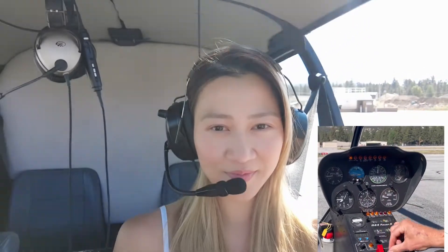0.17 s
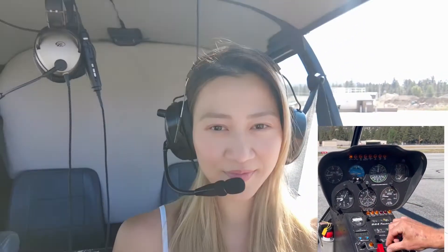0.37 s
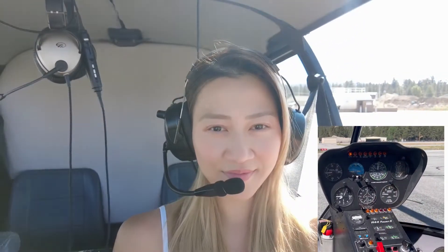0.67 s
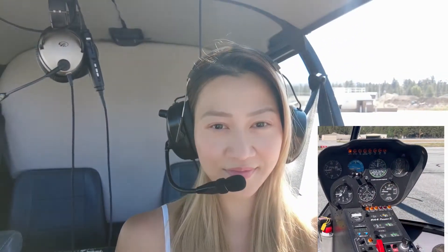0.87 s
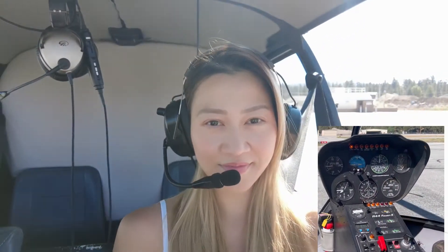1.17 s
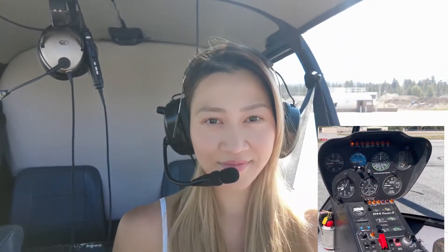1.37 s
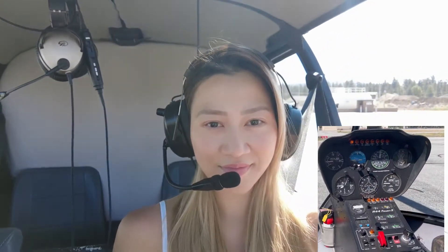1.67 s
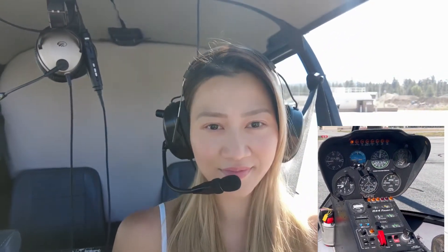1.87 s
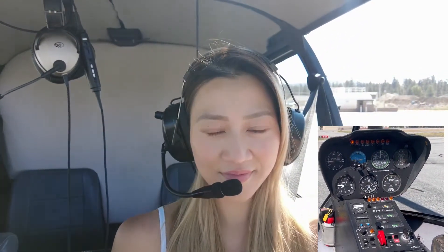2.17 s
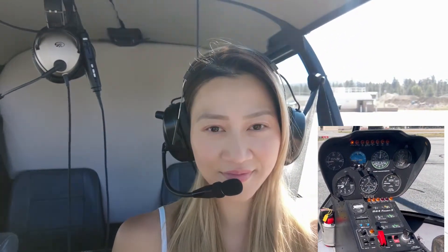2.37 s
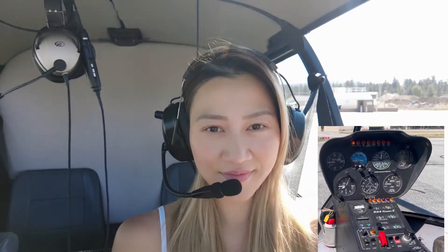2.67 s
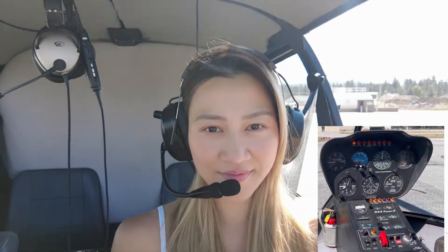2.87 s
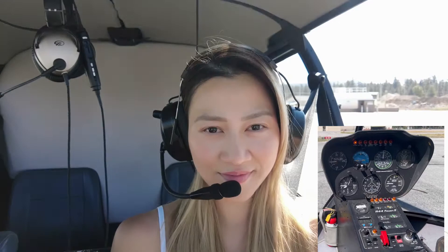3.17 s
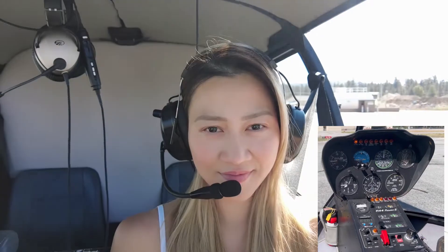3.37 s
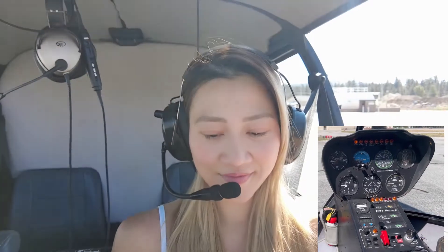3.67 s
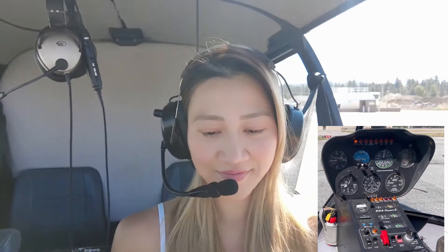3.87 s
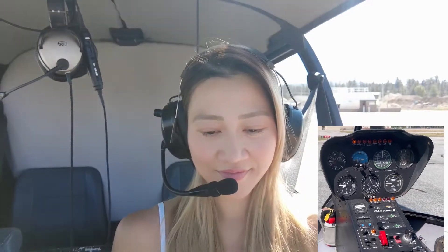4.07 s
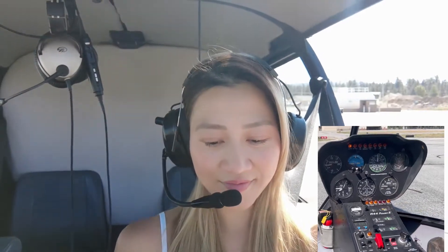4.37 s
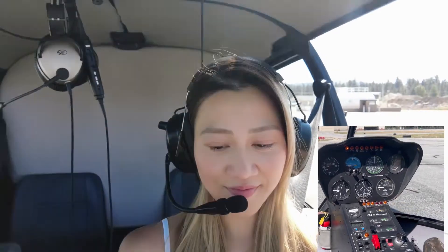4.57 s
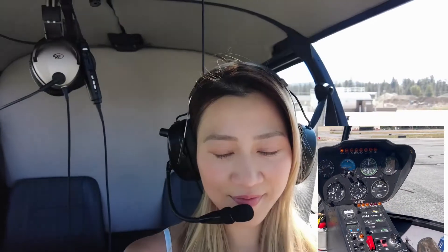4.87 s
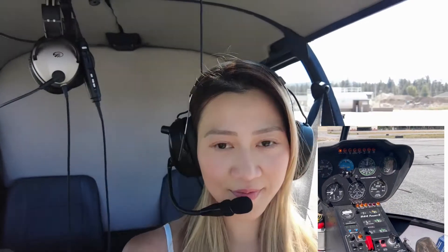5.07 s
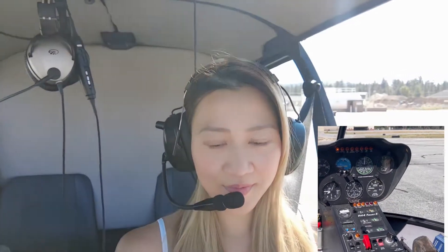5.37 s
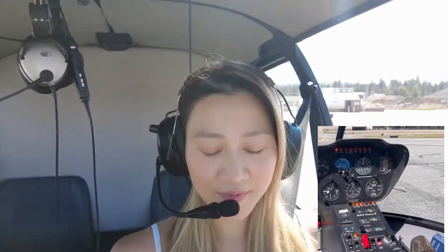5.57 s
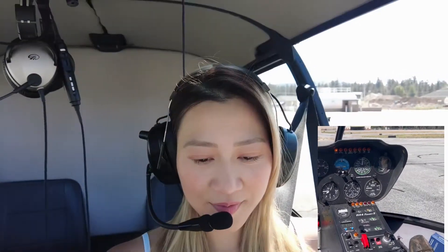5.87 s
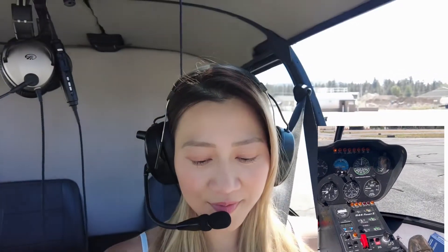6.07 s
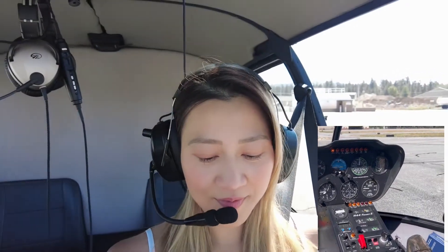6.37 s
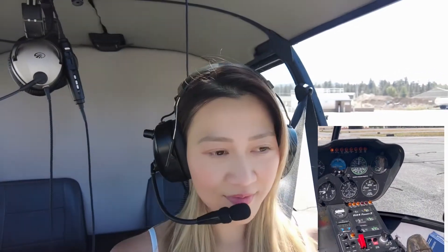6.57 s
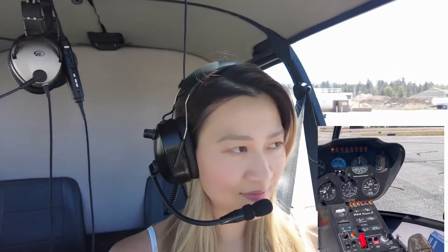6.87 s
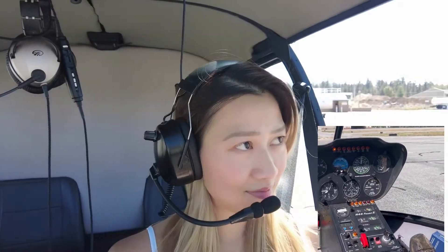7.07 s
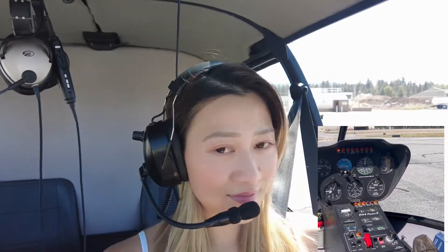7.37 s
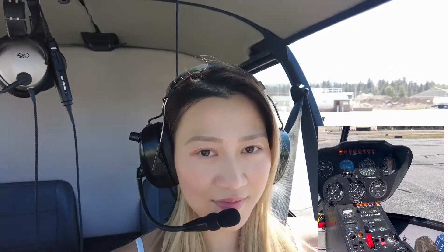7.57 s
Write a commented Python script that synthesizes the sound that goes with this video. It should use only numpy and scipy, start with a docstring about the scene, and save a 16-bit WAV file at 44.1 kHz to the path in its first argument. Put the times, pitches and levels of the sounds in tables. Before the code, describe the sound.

The sound starts with the engine already running inside a small helicopter cabin. A deep drone around 80 to 88 Hz throbs under rapid knocks, about fourteen each second, which ring boxy panels; a gear hum near 600 Hz and a grainy roar of cooling air and valve ticks lie above. Speed rises until 0.5 s, then sags to its lowest at 1.5 s, recovers by 2 s and keeps hunting gently. Bright switch clicks snap at 0.26 s, faintly at 0.6 s, at 1.5 s, and in a cluster from 3.5 to 3.7 s. Misfires thump low from 0.9 s, strongest at 1.4, 5.7 and 6.5 s. From 4.3 to 4.8 s the roar changes colour, some ringing peaks softening. The engine lifts around 5.6 s, dips at 6.7 s, then climbs until the end at 7.7 s, still running. Close, enclosed stereo, without speech.

```python
"""Inside a small helicopter's cabin: a six-cylinder engine idles, first races, then sags and hunts.
Throughout, firings drone at six times the cycle rate, a gear hums, knocks once a cycle ring the cabin,
and cooling air and valve gear roar as noise and ticks shaped by resonances. Switches click early on
and in a cluster near 3.6 s; from 0.9 s misfires thump a low mode. After 4.3 s the passenger leans
forward, which recolours the roar; the engine picks up at the end."""
import sys
import numpy as np
from scipy import signal
from scipy.fft import rfft, irfft, next_fast_len
from scipy.io import wavfile
from scipy.ndimage import uniform_filter1d

SR = 44100
rng = np.random.default_rng(int(sys.argv[2]) if len(sys.argv) > 2 else 0)


def persist_wave(psi):
    """Save psi, clipped to +-1, as 16-bit WAV."""
    counts = np.round(np.clip(psi, -1, 1) * 32767).astype(np.int16)
    wavfile.write(sys.argv[1], SR, np.atleast_2d(counts).T)


N = 340011

# cabin response against engine speed:
# speed_hz [cycles/s], octave_db [dB], gear_db [dB], roof_db [dB], door_db [dB offset]
CABIN_BY_SPEED = [(13.2, -29.5, -33.5, -41, -2), (13.5, -31, -26.5, -44, -1), (13.65, -28.5, -27.5, -40, 0),
                  (13.8, -24.5, -32, -36, 0), (14.1, -21.5, -44, -31, -2), (14.5, -18.5, -54, -32, -6)]


def undb(db):
    """Decibels to an amplitude factor."""
    return np.exp(np.asarray(db) * (np.log(10) / 20))


def level(x, db):
    """Set the rms level."""
    return x * undb(db) / np.sqrt(np.mean(x ** 2))


def by_speed(table, speed):
    """Read every level column of a table at the running engine speed."""
    table_hz, *columns = np.transpose(table)
    return [np.interp(speed, table_hz, column) for column in columns]


def walk(rate):
    """Random levels held 1 / rate s and slewed twice; spread near 1."""
    hold = int(SR / rate)
    steps = np.repeat(rng.standard_normal(N // hold + 1), hold)
    return 1.33 * uniform_filter1d(uniform_filter1d(steps, hold), hold)[:N]


def ring(x, hz, width):
    """A mode applied twice: the ring swells, then dies, with steep skirts."""
    pole = np.exp((2j * np.pi * hz - np.pi * width) / SR)
    return signal.lfilter([1], [1, -2 * pole, pole ** 2], x).imag


def later(x, ms):
    """Delay by whole samples; negative values advance."""
    return np.roll(x, int(round(ms * SR / 1000)))


def blows_at(turns):
    """Sample numbers where a running count of turns passes a whole number."""
    return np.flatnonzero(np.diff(np.floor(turns)))


def tone(cycle, order, db, turn, pan_db, lead, waver_db, drift):
    """A multiple of the cycle rate, wavering in level and phase; the left port leads by lead radians."""
    angle = 2 * np.pi * (order * cycle + turn) + drift * walk(11)
    size = np.sqrt(2) * undb(db + waver_db * walk(30))
    left = undb(pan_db / 2) * np.cos(angle + lead / 2)
    right = undb(-pan_db / 2) * np.cos(angle - lead / 2)
    return size * np.array([left, right])


def knock(cycle, place, hz, width, left_db, right_db, lag_ms):
    """One blow at the same crank angle of every cycle, each of its own strength, rings one mode."""
    scatter_db = 1.7
    at, blows = blows_at(cycle - place), np.zeros(N)
    blows[at] = undb(scatter_db * rng.standard_normal(128))[:len(at)]
    body = level(ring(blows, hz, width), 0)
    return np.array([undb(left_db) * body, undb(right_db) * later(body, lag_ms)])


def drone(cycle, speed):
    """Six firings a cycle make the main tone; its octave and a door tone follow the engine speed."""
    # firing tone, which fades and catches again: time_s [s], level_db [dB]
    firing_curve = [(0, -18.5), (.22, -13), (.46, -13.5), (.77, -13), (1.36, -19), (1.5, -11), (1.89, -12),
                    (1.91, -14.5), (2.655, -23), (2.675, -14), (2.9, -15), (3.6, -16), (3.7, -13.5),
                    (4.3, -12.5), (6.45, -17), (6.7, -10.5), (7.05, -14.5), (7.71, -11.5)]
    fire_db = np.interp(np.arange(N) / SR, *np.transpose(firing_curve))
    octave_db, _, _, door_db = by_speed(CABIN_BY_SPEED, speed)
    firing = tone(cycle, order=6, db=fire_db, turn=-.25, pan_db=-1.6, lead=0, waver_db=1.1, drift=.1)
    octave = tone(cycle, order=12, db=octave_db, turn=.45, pan_db=-.1, lead=.6, waver_db=1.3, drift=.1)
    door = tone(cycle, order=16, db=door_db - 41, turn=-.07, pan_db=8, lead=-.4, waver_db=1.1, drift=.15)
    return firing + octave + door


def gear(cycle, speed):
    """The gear hums on the 43rd multiple of the cycle, loudest where the cabin answers best."""
    _, gear_db, _, _ = by_speed(CABIN_BY_SPEED, speed)
    return tone(cycle, order=43, db=gear_db, turn=-.13, pan_db=2.1, lead=2, waver_db=1.6, drift=.3)


def singing(cycle, speed):
    """Multiples of the cycle sing as they cross a cabin mode; each swells while it lies on its mode."""
    # order [multiple of cycle], mode_hz [Hz], width_hz [Hz], level_db [dB on the mode],
    # left_minus_right_db [dB], left_lead_rad [rad], offset_turns [turns]
    sung_orders = [(13, 180, 30, -36, 0, .75, .62), (15, 200, 14, -41, -8, 0, .97),
                   (20, 274, 12, -43, 3, 1.2, .68), (21, 290, 24, -34, 1, .9, .37),
                   (24, 322, 26, -42, -9, 1, .89), (34, 468, 40, -39, -1, 2, 0),
                   (35, 516, 14, -31, 5, 2, 0), (37, 518, 30, -40, 6, 2, .05),
                   (40, 560, 20, -37, 3, 2, .41), (41, 578, 24, -35, 1, 2, .17),
                   (44, 592, 24, -36, 2, 2.3, .6), (46, 645, 24, -39, 3, 2, 0), (49, 655, 24, -41, 9, 2, 0),
                   (55, 745, 14, -40, -4, 2, 0), (56, 805, 20, -40, 6, 3, 0), (71, 970, 20, -46, -2, 3, 0)]
    out = 0
    for order, hz, width, db, pan_db, lead, turn in sung_orders:
        off_mode_db = 10 * np.log10(1 + (2 * (order * speed - hz) / width) ** 2)
        out = out + tone(cycle, order=order, db=db - off_mode_db, turn=turn,
                         pan_db=pan_db, lead=lead, waver_db=1.5, drift=.25)
    return out


def panel(cycle, speed):
    """A panel near 300 Hz rings best where a multiple of the cycle meets its mode; two tones join it."""
    # place_turns [0-1 of a cycle], mode_hz [Hz], width_hz [Hz],
    # left_db [dB over ring_db], right_db [dB over ring_db], right_lag_ms [ms]
    panel_modes = [(0.375, 301, 38, -7, -1.5, 0.44), (0.695, 322, 16, -15, -8, 0.42)]
    # panel response: speed_hz [cycles/s], ring_db [dB], tone_db [dB, 22nd multiple]
    panel_response = [(13.2, -31, -33), (13.45, -26.5, -34), (13.7, -23.5, -34), (14.15, -25.5, -26),
                      (14.5, -34, -30), (14.8, -30, -36)]
    ring_db, sing_db = by_speed(panel_response, speed)
    rings = undb(ring_db) * sum(knock(cycle, *mode) for mode in panel_modes)
    high = tone(cycle, order=22, db=sing_db, turn=-0.33, pan_db=-6, lead=0.97, waver_db=0.9, drift=0.21)
    low = tone(cycle, order=14, db=-31.5, turn=0.51, pan_db=-9, lead=0.37, waver_db=1.5, drift=0.24)
    return rings + high + low


def knocks(cycle, speed):
    """Blows once a cycle ring the cabin; door and roof rings also change with engine speed."""
    # cabin modes: place_turns [0-1 of a cycle], mode_hz [Hz], width_hz [Hz],
    # left_db [dB, doors before their offset], right_db [likewise], right_lag_ms [ms]
    cabin_modes = [(0.287, 52, 22, -25, -26, 0.09), (0.04, 90, 18, -31, -31, -0.37),
                   (0.975, 126, 31, -38, -33, 0.61), (0.235, 129, 21, -37, -38, -1.5),
                   (0.492, 224, 94, -27.5, -60, -1.5), (0.079, 248, 19, -25, -37, 0.86),
                   (0.555, 409, 22, -48, -47, -0.07), (0.45, 415, 110, -35.5, -33.5, 0.45),
                   (0.69, 410, 90, -50, -41, 0.45), (0.719, 490, 45, -40, -42, -1.18),
                   (0.252, 502, 87, -39, -38, 0.49), (0.29, 532, 68, -34, -38, 0.72),
                   (0.597, 603, 67, -38, -39, -0.9), (0.255, 620, 29, -40, -39, 0.77),
                   (0.005, 644, 94, -37, -39, -0.91), (0.291, 816, 87, -41, -52, -0.65),
                   (0.674, 816, 89, -46, -45, 1.48)]
    # a narrow roof mode, whose level follows the engine speed:
    # place_turns [0-1], mode_hz [Hz], width_hz [Hz], left_db and right_db [dB over roof_db], right_lag_ms [ms]
    roof_mode = (.1, 530, 22, 1, -1, .55)
    # a second narrow mode just above, which swells with the roof: columns and units as roof_mode
    frame_mode = (.3, 576, 14, -5, -4, .55)
    _, _, roof_db, door_db = by_speed(CABIN_BY_SPEED, speed)
    out = undb(roof_db) * (knock(cycle, *roof_mode) + knock(cycle, *frame_mode))
    for mode in cabin_modes:
        # Hz; door rings are strongest at middling engine speeds and fade most when it races
        is_door = 185 < mode[1] < 260
        out = out + undb(door_db * is_door) * knock(cycle, *mode)
    return out


def rumble(cycle):
    """No two firings are equally strong; the unevenness shakes the cabin's low modes."""
    at, uneven = blows_at(6 * cycle), np.zeros(N)
    uneven[at] = rng.standard_normal(768)[:len(at)]
    low = level(ring(uneven, 45.0, 6.1), -29.5)
    middle = level(ring(uneven, 57.4, 26), -22.5)
    high = level(ring(uneven, 115.0, 52), -34.0)
    return low + middle + high


def clatter(cycle, count):
    """Three sets of valve ticks at fixed crank angles, each tick of its own size and sign."""
    places, sizes = rng.random((3, count)), rng.standard_normal((3, count))
    starts = blows_at(cycle)
    lengths = np.diff(starts)
    at = (starts[:-1, None, None] + lengths[:, None, None] * places).astype(int)
    out = np.array([np.bincount(at[:, k].ravel(), np.tile(sizes[k], len(at)), N) for k in range(3)])
    return out / out.std()


def roar(cycle, speed):
    """Air noise and valve clatter in cabin resonances; each octave walks alone and pulses with the cycle."""
    # broad colour, relative until the level is set: pitch_hz [Hz], density_db [dB per Hz]
    roar_colour = [(60, -20), (140, -24.5), (300, -23), (400, -26), (490, -32.5), (600, -26), (900, -24.5),
                   (1300, -27.5), (1650, -32), (2400, -35), (5300, -38.5), (6100, -41.5), (8100, -50.5),
                   (9700, -56.5), (14400, -61), (15200, -74)]
    # resonances and notches, upright and leaning; some stay the same: pitch_hz [Hz], width_hz [Hz],
    # upright_db [dB over the colour], leaning_db [dB over the colour]
    roar_modes = [(535, 50, 5, 5), (665, 40, 5, 1), (748, 16, 9, 10), (795, 25, 6, 4), (865, 25, 5, 4),
                  (970, 30, 5, 8), (1035, 25, 6, 3), (1115, 30, -1, -3), (1160, 25, 5, 3), (1220, 50, 5, 7),
                  (1350, 60, -3, 0), (1455, 35, 8, 1), (1400, 30, 0, 3), (1640, 50, -2, 0),
                  (1720, 50, 2, 1), (1815, 40, -3, -1), (1870, 40, 3, 1), (2110, 55, 6.5, 2),
                  (2170, 50, 0, -3), (2233, 14, 4, 5), (2350, 40, -3, 0), (2470, 50, 3, 4),
                  (2575, 50, 6.5, 5), (2650, 50, 2, 4), (2790, 160, 3.5, 0), (2960, 50, 1, 4),
                  (3080, 55, 8.5, 0), (3160, 70, 3, 3), (3330, 80, -2, -1), (3450, 80, 4, 1),
                  (3610, 70, 2, 1), (3750, 80, -2, -1), (5170, 300, 4, 4), (5620, 300, -10, -10),
                  (7500, 500, -9, -9)]
    # two microphone ports: pitch_hz [Hz], likeness [0-1], left_minus_right_db [dB], right_lag_ms [ms]
    port_pair = [(101, 0.64, 17.5, 0.14), (428, 0.89, 0, 0.17), (1070, 0.41, 2, 0.52),
                 (2280, 0.35, 2, 0.37), (4840, 0.22, 6.5, 0.4), (6600, 0.01, 7, 0.23),
                 (8500, 0.1, 4.5, 0.079), (9300, 0.99, 1.5, .052), (10800, 0.68, -0.5, 0.038),
                 (12200, 1, 0, 0.003)]
    # valve clatter returning at the same crank angles: pitch_hz [Hz], share [0-1 of the power]
    clatter_share = [(300, .4), (700, .55), (1000, .55), (1500, .35), (2500, .05)]
    # lean_start_s [s], lean_end_s [s]
    lean_span = (4.3, 4.8)
    reference_hz, reference_db = 13.26, -33  # reference cycle rate; roar level there at the start
    db_per_hz, db_per_s = 1.22, -0.0767  # rises with speed, settles slowly

    t = np.arange(N) / SR
    size = next_fast_len(N, True)
    hz = np.maximum(np.arange(size // 2 + 1) * SR / size, 1)

    def along(table, column):
        """Read a column on a log frequency axis."""
        table = np.array(table)
        return np.interp(np.log(hz), np.log(table[:, 0]), table[:, column])

    # one row upright, one leaning
    shape_db = along(roar_colour, 1) + sum(
        np.outer(lifts_db, 1 / (1 + (2 * (hz - mode_hz) / width) ** 2))
        for mode_hz, width, *lifts_db in roar_modes)

    # three sources: one common to both ports and one for each alone
    ticks = along(clatter_share, 1) * (hz < clatter_share[-1][0])
    air = np.sqrt(1 - ticks) * rfft(rng.standard_normal((3, N)), size)
    valves = np.sqrt(ticks) * rfft(clatter(cycle, count=160), size)
    both, left, right = air + valves

    like = np.clip(along(port_pair, 1), 0, 1)
    pan_db = along(port_pair, 2)
    lag = np.exp(-2j * np.pi * hz * along(port_pair, 3) / 1000)
    left = undb(pan_db / 2) * (np.sqrt(like) * both + np.sqrt(1 - like) * left)
    right = undb(-pan_db / 2) * (np.sqrt(like) * both * lag + np.sqrt(1 - like) * right)
    pairs = (undb(shape_db)[:, None] * np.array([left, right])).astype(np.complex64)
    # unit level: the upright port average between 1500 and 6000 Hz
    pairs = pairs / np.std(irfft(pairs[0].mean(axis=0) * (hz > 1500) * (hz < 6000), size))

    out = 0
    # octave number above 125 Hz, pulse depth dB, place in the cycle
    for k, pulse_db, place in [(0, 1.2, 0.31), (1, 0.45, 0.3), (2, 1.8, 0.6), (3, 0.86, 0.41),
                               (4, 0.71, 0.18), (5, 0.79, 0.26), (6, 1.26, 1), (7, 0.77, .8)]:
        distance = np.clip(np.log2(hz / 125.) - k, -1 if k else 0, 1)  # lowest band keeps all below it
        share = np.cos(np.pi / 2 * distance) ** 2
        throb_db = pulse_db * np.cos(2 * np.pi * (cycle - place)) + 0.48 * walk(2.94) + 0.44 * walk(15)
        out = out + undb(throb_db) * irfft(pairs * share, size)[..., :N]

    lean = np.interp(t, lean_span, [0, 1])
    db = reference_db + db_per_hz * (speed - reference_hz) + db_per_s * t
    return undb(db) * ((1 - lean) * out[0] + lean * out[1])


def clicks():
    """Switches click: small bright noise bursts that rattle for a moment, then die; centred."""
    # start_s [s], peak_db [dB, nominal before the filters], rattle_s [s], t60_s [s]
    switch_clicks = [(0.264, -18.5, 0.0037, 0.037), (0.272, -25, .001, .04), (0.585, -42.5, .03, 0.1),
                     (1.496, -25, .005, 0.04), (3.5155, -33, .008, 0.04), (3.5845, -22, .006, 0.04),
                     (3.6328, -26, .006, 0.05), (3.706, -18.5, 0.0054, 0.05)]
    crest_db = 16  # a click's nominal peak over its noise level
    out, t = np.zeros(N), np.arange(SR // 10) / SR
    for start, db, rattle, t60 in switch_clicks:
        attack = np.minimum(t / 0.0008, 1) + 2.1 * np.exp(-t / 0.0007)
        decay = 1000. ** (-np.maximum(t - rattle, 0) / t60)
        burst = rng.standard_normal(len(t)) * attack * decay
        first = int(start * SR)
        out[first:first + len(t)] += undb(db - crest_db) * burst

    def filtered(edges_hz, kind):
        """Gentle first-order filter over the dry clicks."""
        return signal.sosfilt(signal.butter(1, edges_hz, kind, fs=SR, output="sos"), out)

    bright = filtered(4000, "high")
    return bright + undb(7.0) * filtered([12900, 15000], "band") + undb(7.5) * filtered([6100, 6500], "band")


def thumps():
    """A missed firing jolts a low mode of the cabin."""
    # misfires: start_s [s], peak_db [dB]
    misfires = [(0.925, -25), (1.425, -12), (2.969, -20), (3.367, -24), (4.373, -22), (4.742, -22),
                (5.679, -12), (6.501, -9.5)]
    jolts = np.zeros(N)
    for start, db in misfires:
        jolts[int(start * SR)] = undb(db)
    shape = ring(np.eye(1, SR)[0], 58, 31)
    return signal.fftconvolve(jolts, shape / np.abs(shape).max())[:N]


def scene():
    """Everything that turns follows one crank angle, the running sum of the engine speed."""
    # the idle hunts: time_s [s], speed_hz [engine cycles/s]
    hunting = [(0.0, 13.97), (0.094, 14.17), (0.3, 14.63), (0.494, 14.78), (0.734, 14.36), (0.894, 13.98),
               (1.184, 13.97), (1.35, 13.57), (1.514, 13.09), (1.7, 13.33), (1.9, 13.6), (2.124, 13.86),
               (2.28, 13.85), (2.454, 13.9), (2.724, 13.5), (3.0, 13.66), (3.15, 13.72), (3.304, 13.86),
               (3.5, 13.69), (3.794, 13.47), (4.0, 13.44), (4.204, 13.33), (4.33, 13.33), (4.464, 13.53),
               (4.6, 13.55), (4.75, 13.41), (4.92, 13.49), (5.1, 13.56), (5.304, 13.5), (5.494, 13.96),
               (5.634, 14.03), (5.8, 13.82), (5.95, 13.66), (6.124, 13.5), (6.374, 13.87), (6.53, 13.51),
               (6.694, 13.2), (6.85, 13.46), (7.0, 13.68), (7.134, 13.9), (7.4, 14.06), (7.71, 14.27)]
    speed = np.interp(np.arange(N) / SR, *np.transpose(hunting))
    cycle = np.cumsum(speed) / SR
    engine = drone(cycle, speed) + gear(cycle, speed) + singing(cycle, speed)
    cabin = panel(cycle, speed) + knocks(cycle, speed) + rumble(cycle)
    return engine + cabin + roar(cycle, speed) + clicks() + thumps()


def record(dry):
    """The deepest bass is taken off without phase shift, peaks are rounded and the top is cut."""
    ceiling, top_hz = 1.3, 15850
    dry = signal.sosfiltfilt(signal.butter(3, 33, "high", fs=SR, output="sos"), dry)
    rounded = ceiling * np.tanh(dry / ceiling)
    return signal.sosfilt(signal.ellip(8, .2, 70, top_hz, fs=SR, output="sos"), rounded)


dry = scene()
out = record(dry)
persist_wave(out)
```